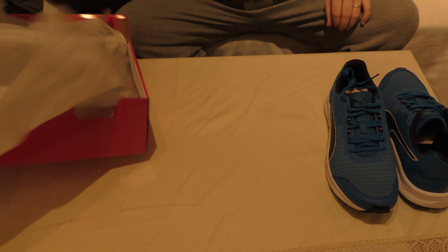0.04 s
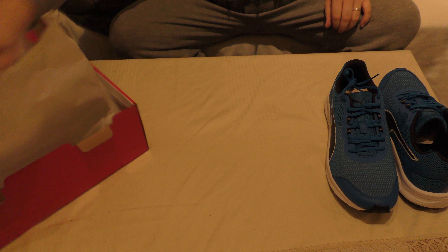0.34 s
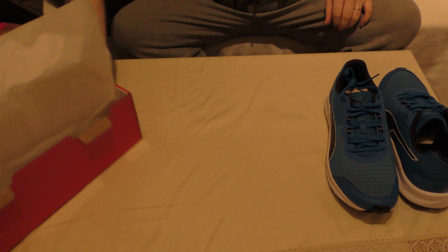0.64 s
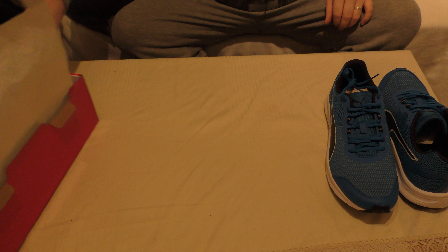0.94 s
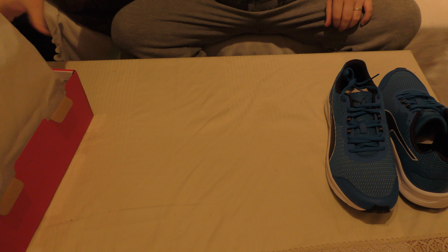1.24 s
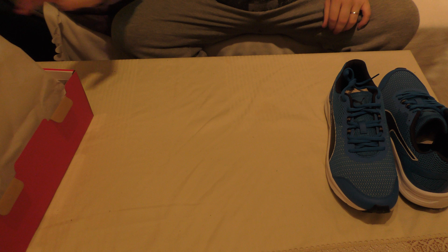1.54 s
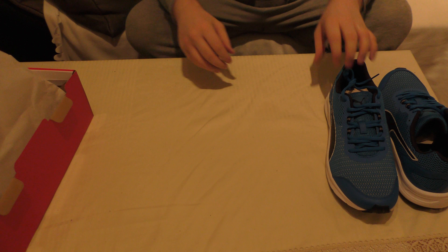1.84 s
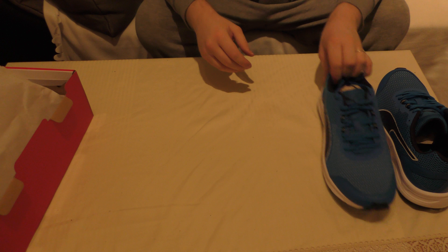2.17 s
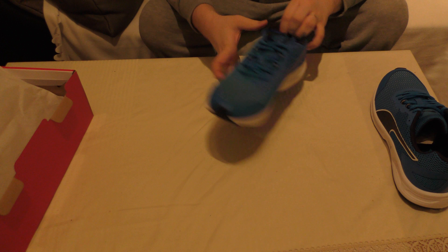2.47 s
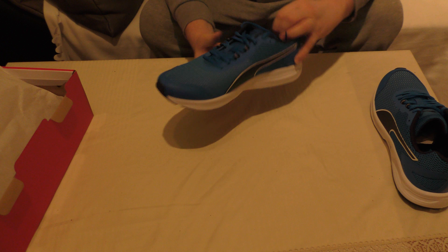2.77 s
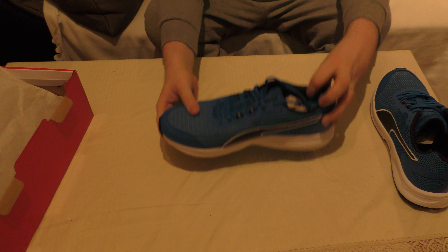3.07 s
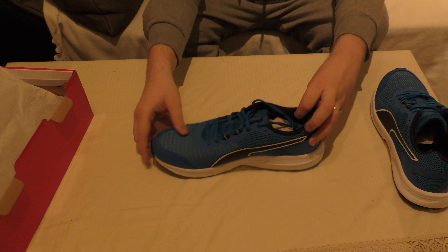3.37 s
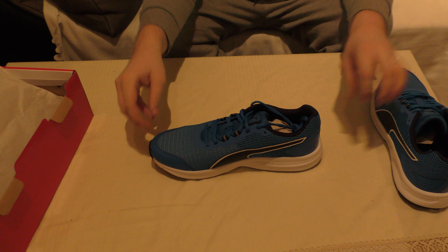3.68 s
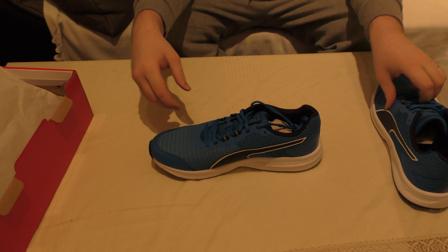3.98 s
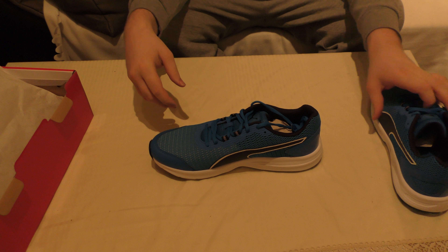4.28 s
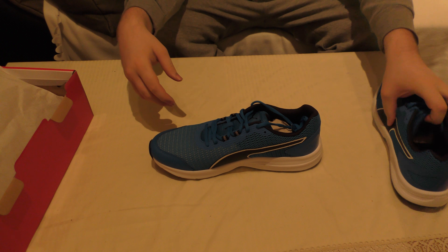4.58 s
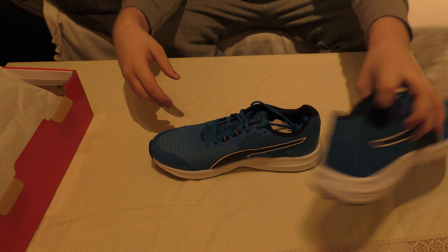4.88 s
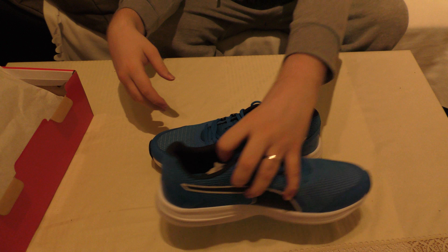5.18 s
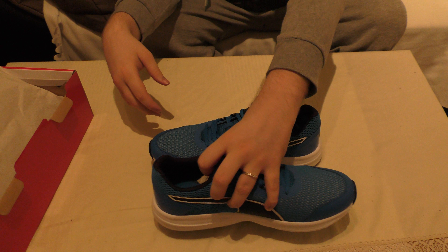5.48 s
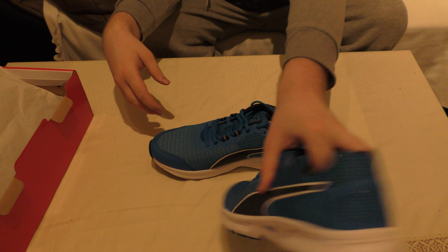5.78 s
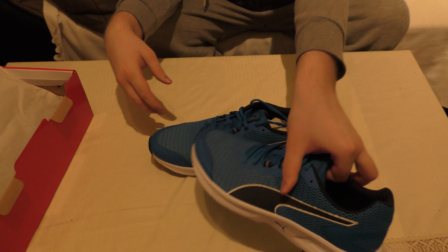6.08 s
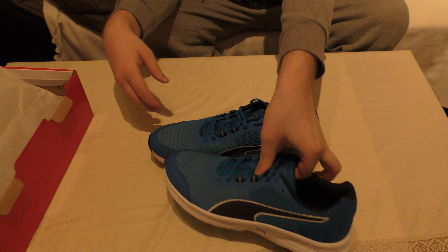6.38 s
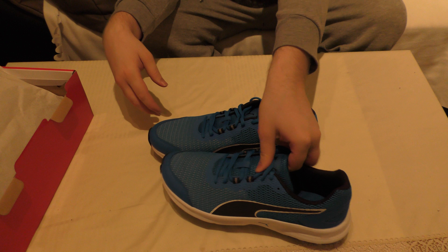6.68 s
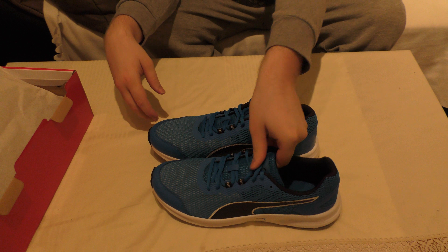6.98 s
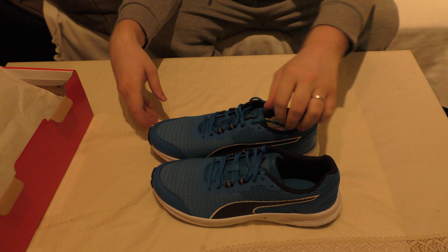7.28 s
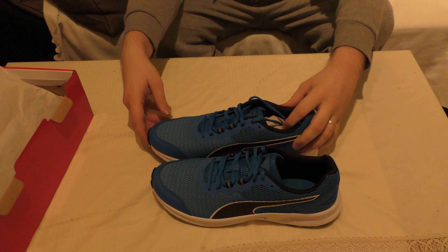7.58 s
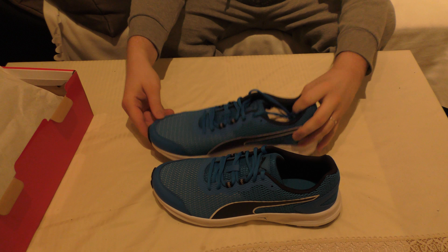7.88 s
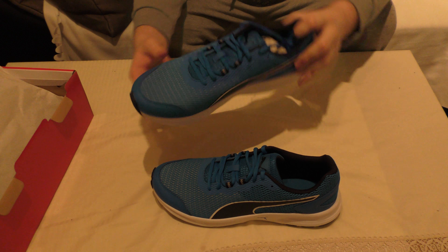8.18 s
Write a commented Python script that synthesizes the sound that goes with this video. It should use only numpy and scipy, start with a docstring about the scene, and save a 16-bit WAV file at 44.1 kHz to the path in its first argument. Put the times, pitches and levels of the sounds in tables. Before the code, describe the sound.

A cardboard shoe box is bumped and pushed across a cloth-covered table with hollow knocks and a scrape, while tissue paper crinkles inside. After about a second it gets quieter: hands and sleeves rub over mesh trainers, with light finger taps. The soft soles land in a cluster of dull, low thumps, then twice more later on. The sound is close, in a small, quiet room with slight reverberation.

```python
"""First come the hollow knocks of a cardboard shoe box, bumped down and pushed aside on a cloth-covered
table: each impact excites damped modes of card and table top. Tissue paper inside crinkles as it buckles.
Then two trainers are picked up, turned and set down on soft soles, which excite mostly the low modes.
Sleeves and mesh uppers rub by stick-slip friction, fingers tap, and a small room reverberates."""
import sys
import numpy as np
from scipy import signal
from scipy.fft import rfft, irfft
from scipy.io import wavfile
from scipy.ndimage import uniform_filter1d

SR = 44100
rng = np.random.default_rng(int(sys.argv[2]) if len(sys.argv) > 2 else 0)


def dump_mix(stems):
    """Bounce the given channels to the path in sys.argv[1] as a 16-bit WAV at rate SR."""
    frames = np.atleast_2d(stems).T  # one column per channel
    limited = np.clip(frames, -1, 1)  # hard clip at full scale
    pcm = np.round(limited * 32767).astype(np.int16)
    wavfile.write(sys.argv[1], SR, pcm)


N = 371630
TIME, HZ = np.arange(N) / SR, np.fft.rfftfreq(N, 1 / SR)

# Levels in the tables are relative; a fall is the time to decay by a factor e.
# spectrum of the still room: (frequency [Hz], level [dB])
HUSH_SPECTRUM = [(25, -4), (60, 2.5), (110, 2.5), (280, 1), (450, -5.5), (750, -17.5), (1100, -9.5),
                 (1700, -7.5), (2600, -8), (4000, -29), (6500, -39), (9500, -19), (16000, -18)]
# reverberation time of the room: (frequency [Hz], t60 [s])
ROOM_DECAY = [(100, 0.14), (250, 0.97), (600, 0.53), (2000, 0.27), (6000, 0.5), (16000, 0.35)]
# reflections from walls and ceiling: (delay [s], level [dB])
REFLECTIONS = [(0.021, -8.5), (.032, -9.5), (.038, -6.5)]
# stereo width: (frequency [Hz], side over mid [ratio])
STEREO_WIDTH = [(30, 1), (70, 0.89), (150, 0.25), (300, 0.56), (600, 0.23), (1200, 0.4), (2500, 0.46),
                (5000, 0.36), (8000, 0.093), (14000, 0.6)]
# a thin squeak as a shoe is lifted: (time [s], pitch [Hz], level [dB])
SQUEAK_CURVE = [(7.879, 13500, -85), (7.92, 13620, -73), (7.99, 13280, -74), (8.04, 13700, -75),
                (8.08, 14200, -71), (8.12, 14350, -68), (8.15, 14400, -88)]
# a last rustle of the settling tissue near 1.4 s, then hands and sleeves stroke the shoes: (start [s], rise
# [s], hold [s], rub [dB], hiss [dB])
HAND_STROKES = [(1.388, 0.036, 0.086, -63, -82), (1.66, .03, 0.064, -77, -64),
                (1.817, 0.12, 0.099, -61, -58.5), (2.057, 0.026, 0.14, -54.5, -58.5),
                (2.212, 0.039, 0.26, -56.5, -59.5), (2.519, 0.066, 0.11, -53, -58),
                (2.772, 0.014, .01, -57, -64), (2.834, 0.19, 0.18, -56, -52.5),
                (3.196, 0.09, 0.22, -58, -67), (3.442, 0.065, .15, -56.5, -62),
                (3.99, 0.0086, 0.14, -58, -63.5), (4.204, 0.053, .03, -53, -60.5),
                (4.312, 0.11, .03, -54.5, -60.5), (4.514, 0.084, 0.11, -56.5, -62),
                (4.927, 0.075, .02, -59, -61), (5.613, 0.044, .035, -54.5, -61.5),
                (5.729, .17, 0.018, -55, -55.5), (6.016, 0.046, 0.11, -55.5, -61),
                (6.195, 0.17, 0.16, -53.5, -59.5), (6.565, .01, 0.082, -52, -52.5),
                (6.755, 0.084, 0.12, -59.5, -66), (6.954, 0.044, 0.064, -55.5, -63),
                (7.052, 0.16, 0.02, -54.5, -59.5), (7.538, 0.024, 0.063, -54, -60),
                (7.7, 0.027, .01, -61, -64), (7.812, 0.028, 0.53, -61.5, -70), (8.26, 0.036, .12, -60, -67)]
# dull rub of fabric: (frequency [Hz], level [dB])
RUB_SPECTRUM = [(60, -7.5), (150, 3.5), (350, 3.5), (550, -4), (780, -4.5), (1100, 2.5), (1500, 0.5),
                (2200, -3), (3200, -6), (5000, -18), (16000, -35.5)]
# fine hiss of the weave: (frequency [Hz], level [dB])
WEAVE_SPECTRUM = [(500, -21), (2000, 5), (3500, 4), (6000, -0.5), (8000, 0), (10500, 0.5), (13000, -3.5),
                  (16000, -13)]
# fingers, soles and lace tips tap: (time [s], level [dB], centre [Hz], width [octaves])
SHOE_TAPS = [(1.063, -40, 2420, 1), (1.524, -46.5, 1800, 0.59), (1.867, -50, 4970, .46),
             (2.082, -58, 352, 0.59), (2.244, -50.5, 463, 0.22), (2.255, -44, 6000, 1.6),
             (2.424, -46.5, 1900, 0.34), (2.558, -43.5, 2180, 0.37), (2.601, -48, 1180, 0.46),
             (2.604, -49.5, 236, 0.5), (2.7817, -45.5, 4030, 3.3), (2.868, -41.5, 2050, 0.24),
             (3.997, -47.5, 1360, 0.58), (3.998, -47.5, 266, 0.94), (4.0613, -43.5, 1410, 0.5),
             (4.0629, -41.5, 8100, 1.4), (4.133, -47, 273, 0.72), (4.253, -42.5, 333, 0.25),
             (4.268, -45.5, 354, 1.3), (4.458, -48.5, 1150, 1.2), (5.2077, -53, 7000, 1.6),
             (6.137, -51, 420, 1.96), (6.5796, -37.5, 1080, 0.34), (6.587, -34, 4900, 2.6),
             (6.613, -47, 1080, .2), (7.5635, -44, 1995, 0.81), (7.635, -44, 6000, 2),
             (7.734, -47, 1700, 0.38), (8.228, -48, 1650, 0.75), (8.312, -49, 1040, 0.22),
             (8.352, -50.5, 1190, 0.21), (8.418, -55, 1300, .4)]
# card and mesh creak as they drag: (time [s], level [dB], centre [Hz], fall [s])
DRAG_CREAKS = [(.307, -31.5, 1695, 0.048), (2.885, -56, 10200, .034), (2.95, -54.5, 1340, 0.13),
               (5.909, -55, 1049, 0.039)]
# a sole lands or rocks on the table: (time [s], level [dB], cut-off [Hz])
SOLE_IMPACTS = [(2.11, -40.5, 400), (3.356, -20.5, 268), (3.513, -20, 330), (3.543, -25, 276),
                (3.5691, -15.5, 310), (4.461, -39, 387), (6.1741, -23.5, 233), (6.276, -41, 240),
                (6.998, -23.5, 320), (7.084, -40.5, 265), (7.549, -35, 194.3), (7.619, -35.5, 210),
                (7.724, -48, 250), (7.857, -44, 169), (7.92, -44, 165)]
# modes of the table top: (frequency [Hz], level [dB], t60 [s])
TABLE_MODES = [(103.6, -30.5, 0.73), (144.7, -5, 0.087), (165, -29, 0.13), (196, -2.5, 0.025),
               (260.4, -21.5, 0.23), (297, -25, 0.046), (372.6, -23, 0.091), (460, -36, 0.039)]
# the tissue is pressed or jolted, then settles: (peak time [s], level [dB], rise [s], fall [s])
TISSUE_CRUMPLES = [(0, -45.5, .01, .06), (.154, -21, 0.003, 0.0025), (.266, -36, 0.079, 0.15),
                   (.445, -35, 0.00084, 0.01), (.585, -36.5, 0.12, 0.12), (.7505, -25, 0.002, 0.014),
                   (.77, -35, .006, 0.065), (1.08, -48, 0.13, 0.16), (1.336, -44.5, 0.011, 0.08)]
# crumpling tissue: (frequency [Hz], level [dB])
CRUMPLE_SPECTRUM = [(400, -3), (780, -10), (1100, 2.5), (1500, 3.5), (2300, 3.5), (3300, 1), (5000, -3.5),
                    (7000, -8), (10500, -9), (13000, -16), (16000, -18)]
# folds of tissue snap: (time [s], level [dB], fall [s])
FOLD_SNAPS = [(0.084, -42.5, .003), (0.153, -27, 0.0023), (0.545, -21, 0.006), (.592, -32, 0.016),
              (.61, -31, 0.01), (0.674, -35.5, 0.0043), (0.911, -36, 0.0038), (1.02, -41.5, 0.0032),
              (1.086, -35, 0.0027), (1.147, -44, 0.0034), (1.341, -43, .011)]
# a snapping fold: (frequency [Hz], level [dB])
SNAP_SPECTRUM = [(200, -4), (1000, -11.5), (2000, -0.5), (3200, -1), (5000, -4.5), (9000, -3),
                 (12000, -3.5), (16000, -15.5)]
# the box is shoved along the cloth: (peak time [s], level [dB], rise [s], fall [s])
BOX_SHOVES = [(0, -50.5, .01, 0.13), (.16, -40, 0.052, 0.071), (.29, -29, 0.052, .027),
              (.6, -39, 0.088, 0.064), (.78, -36, 0.014, 0.056), (1.0, -46, 0.34, 0.16)]
# card sliding on cloth: (frequency [Hz], level [dB])
SLIDE_SPECTRUM = [(40, -33), (100, -27), (142, 14.5), (190, -7), (300, 2.5), (520, -4), (800, -12.5),
                  (1150, -6.5), (1500, -13), (1770, -9), (2300, -12.5), (4000, -15), (16000, -39)]
# the box meets the table: (time [s], level [dB], crack pitch [ratio], panel ring [dB], table boom [dB])
BOX_BUMPS = [(0.156, -9, 1.77, -23.5, -38), (.168, -17, 1.33, -23, 5), (.247, -36, 0.66, -33, 22.5),
             (0.255, -23.5, 0.98, -5.5, 14.5), (.270, -30.5, 1.1, 3.5, 19.5), (.287, -26.5, 0.83, -10, 9.5),
             (.445, -9.5, 1.03, -13, 3.5), (.465, -32.5, 0.95, 3.5, -20.5), (0.493, -36.5, 0.39, 4, 28),
             (0.748, -33.5, 2.7, -13, 19.5), (.757, -24, 1.54, -7.5, 8.5)]
# heavily damped modes of the struck card: (frequency [Hz], level [dB], t60 [s])
CRACK_MODES = [(401, -6, 0.026), (549, -15, 0.025), (721, -7.5, 0.019), (1080, -2.5, 0.012),
               (1110, -4.5, 0.01), (1350, -11, 0.026), (2800, -11.5, 0.011)]
# modes of the cardboard panels: (frequency [Hz], level [dB], t60 [s])
PANEL_MODES = [(141, -5, .5), (254, 0, .45), (313, -10, .3), (380, -2, .25), (431, -2, .3), (505, -3, .28),
               (550, -5, .3), (645, -12, .2), (1149, -10, .08), (1374, -7, .08), (1545, -10, .1),
               (1960, -10, .06)]


def amp(db):
    """Amplitude grows tenfold every 20 dB."""
    return 10 ** (np.asarray(db) / 20)


def unit(x):
    """Normalisation to rms 1."""
    return x / np.sqrt(np.mean(x ** 2) + 1e-20)


def read(points, hz):
    """Interpolation on a logarithmic frequency axis."""
    frequencies, values = np.transpose(points)
    return np.interp(np.log(hz + 1), np.log(frequencies + 1), values)


def add(mix, s, sound):
    """Superposition: a sound joins the mix at s seconds."""
    part = mix[max(round(s * SR), 0):][:len(sound)]
    part += sound[:len(part)]


def tint(x, spectrum):
    """Spectral shaping, at rms 1."""
    return unit(irfft(rfft(x) * amp(read(spectrum, HZ)), N))


def muffle(x, hz, order=2):
    """Low-pass filtering: a softer contact passes less treble."""
    return signal.sosfilt(signal.butter(order, min(hz, SR / 2 - 100), fs=SR, output="sos"), x)


def ring(modes, detune=0, stiffness=1):
    """Free vibration is a sum of damped modes, shifted by the place struck; slow motion radiates poorly."""
    t = TIME[:SR // 2]
    motion = np.zeros(len(t))
    for hz, db, t60 in modes:
        shifted_hz = hz * stiffness * (1 + detune * rng.normal())
        motion += amp(db - 60 * t / t60) * np.sin(2 * np.pi * shifted_hz * t)
    return signal.sosfilt(signal.butter(4, 112, "high", fs=SR, output="sos"), motion)


def grains(per_s, spread_db, bed):
    """Shot noise: slips and buckles of unequal size over a bed of countless smaller ones."""
    size = amp(spread_db * np.minimum(rng.exponential(1, N), 4))
    occurs = rng.random(N) < per_s / SR
    clicks = unit(size * occurs * rng.standard_normal((2, N)))
    return clicks + bed * rng.standard_normal((2, N))


def patchy(x, depth_db):
    """Spectral modulation: shifting contact lifts and lowers patches of the spectrum briefly."""
    spectra = signal.stft(x, nperseg=512, noverlap=384)[2]
    patches = uniform_filter1d(rng.standard_normal(spectra.shape[1:]), size=9, axis=0)
    patches = unit(uniform_filter1d(patches, size=9, axis=1))
    return signal.istft(spectra * amp(depth_db * patches), nperseg=512, noverlap=384)[1][:, :N]


def swell(s, db, rise, fall):
    """Exponential growth to a peak at s seconds, then exponential decay."""
    return amp(db) * np.exp(-np.maximum((s - TIME) / rise, (TIME - s) / fall).clip(0, 20))


def swells(rows):
    """Incoherent swells of noise add in power."""
    return np.sqrt(sum(swell(*row) ** 2 for row in rows))


def stereo(pair):
    """Partial coherence: two unrelated signals, as mid and side, form left and right."""
    side = irfft(rfft(pair[1]) * read(STEREO_WIDTH, HZ), N)
    return np.array([pair[0] + side, pair[0] - side])


def pan(x, left_db):
    """A level difference between the ears leans a source to the left."""
    return x * amp([[left_db / 2], [-left_db / 2]])


def walls(x):
    """Early reflections add delayed, weaker copies of a sound."""
    out = x.copy()
    for delay, db in REFLECTIONS:
        add(out, delay, amp(db) * x)
    return out


def room(x, wet_db):
    """Reverberation: a diffuse tail follows the direct sound, each band decaying at its own rate."""
    hz, t, spectra = signal.stft(rng.standard_normal((2, SR * 3 // 4)), SR, nperseg=256)
    decay = amp(-60 * t / read(ROOM_DECAY, hz)[:, None])
    tail = signal.istft(spectra * decay, SR, nperseg=256)[1]
    tail *= np.clip((TIME[:tail.shape[1]] - .003) / 0.0034, 0, 1)  # the first walls answer after 3 ms
    mono = np.atleast_2d(x).mean(0)[None]
    wet = signal.fftconvolve(mono, tail / np.linalg.norm(tail[0]), axes=1)[:, :N]
    return x + amp(wet_db) * stereo(wet)


def hush():
    """Stationary noise, strongest in the bass, is the background of the still room."""
    return amp(-64) * stereo(tint(rng.standard_normal((2, N)), HUSH_SPECTRUM))


def squeak(jitter_hz=110):
    """Random frequency modulation makes a faint, very high whistle unsteady."""
    s, hz, _ = np.transpose(SQUEAK_CURVE)
    jitter = unit(uniform_filter1d(rng.standard_normal(N), size=60))
    pitch = np.interp(TIME, s, hz) + jitter_hz * jitter
    level_db = np.interp(TIME, s, [db for _, _, db in SQUEAK_CURVE])
    sounding = (TIME > s[0]) & (TIME < s[-1])
    return amp(level_db) * sounding * np.sin(2 * np.pi * np.cumsum(pitch) / SR)


def stroke(start, rise, hold, sag_db_per_s=11.5, release_s=0.097):
    """Friction noise follows sliding speed: a hand speeds up, eases off and stops."""
    t = np.maximum(TIME - start, 0)
    attack = np.minimum(t / rise, 1)
    sag = amp(-sag_db_per_s * np.maximum(t - rise, 0))
    release = np.exp(-((t - rise - hold) / release_s).clip(0, 20))
    return attack * sag * release


def cloth():
    """Stick-slip friction of fabric gives a dull rub, and a fine hiss where threads catch."""
    rub_power, hiss_power = amp(-66) ** 2, amp(-73.5) ** 2  # clothes never keep quite still
    for start, rise, hold, rub_db, hiss_db in HAND_STROKES:
        speed = stroke(start, rise, hold)
        rub_power += (amp(rub_db) * speed) ** 2
        hiss_power += (amp(hiss_db) * speed) ** 2
    slips = patchy(grains(per_s=900, spread_db=2.5, bed=1.58), depth_db=2.87)
    rub = tint(slips, RUB_SPECTRUM) * np.sqrt(rub_power)
    hiss = tint(grains(per_s=700, spread_db=3.0, bed=2.3), WEAVE_SPECTRUM) * np.sqrt(hiss_power)
    grip_db = 0.87 * unit(muffle(rng.standard_normal(N), hz=35)) - 1.5
    return room(stereo(rub + hiss) * amp(grip_db), wet_db=-9.5)


def touch(db, centre_hz, octaves, fall):
    """Source and filter: an impulse and a dying scratch excite one resonance."""
    fade = np.exp(-TIME[:SR // 2] / fall)
    contact = rng.standard_normal(len(fade)) * fade
    contact[0] += 6  # the impulse
    edges = np.minimum(centre_hz * 2 ** (np.array([-.5, .5]) * octaves), [SR / 3, SR / 2.1])
    sound = signal.sosfilt(signal.butter(1, edges, "band", fs=SR, output="sos"), contact)
    return amp(db) * unit(muffle(sound, 2 * edges[1])) * np.std(fade)


def taps_and_creaks(fall_cycles=6.05):
    """Equal damping per cycle makes low taps last longer than high ones; creaks have a narrower band."""
    out = np.zeros(N)
    for s, db, centre_hz, octaves in SHOE_TAPS:
        add(out, s, touch(db, centre_hz, octaves, fall_cycles / centre_hz))
    for s, db, centre_hz, fall in DRAG_CREAKS:
        add(out, s, touch(db, centre_hz, octaves=0.17, fall=fall))
    return room(out, wet_db=-5)


def soles():
    """A compliant impact excites mostly low modes: foam soles draw a short boom from the table."""
    out = np.zeros(N)
    for s, db, cutoff_hz in SOLE_IMPACTS:
        add(out, s, -amp(db) * muffle(ring(TABLE_MODES), cutoff_hz, order=3))
    return room(walls(out), wet_db=-15.5)


def tissue(rise_over_fall=0.98):
    """Buckling paper emits countless tiny clicks; a whole fold gives way in one short burst."""
    clicks = grains(per_s=4000, spread_db=2.0, bed=0.35)
    crush = amp(-1) * tint(clicks, CRUMPLE_SPECTRUM) * swells(TISSUE_CRUMPLES)
    bursts = sum(swell(s, db, rise_over_fall * fall, fall) for s, db, fall in FOLD_SNAPS)
    folds = tint(rng.standard_normal((2, N)), SNAP_SPECTRUM) * bursts
    return pan(room(stereo(crush + folds), wet_db=-6.0), left_db=1.5)


def box(boom_band_hz=(122, 910)):
    """Impacts excite the modes of the struck card, the panels and the table; sliding friction scrapes."""
    cracks, panels, booms = np.zeros((3, N))
    for s, db, stiffness, ring_db, boom_db in BOX_BUMPS:
        crack = muffle(ring(CRACK_MODES, stiffness=stiffness), hz=2250 * stiffness)
        add(cracks, s, amp(db - 2) * crack)
        add(panels, s, amp(db + ring_db) * ring(PANEL_MODES, detune=0.0035))
        add(booms, s, -amp(db + boom_db) * ring(TABLE_MODES))
    # the light box cannot shake the table as deeply as a shoe
    booms = signal.sosfilt(signal.butter(2, boom_band_hz, "band", fs=SR, output="sos"), booms)
    slips = patchy(grains(per_s=1200, spread_db=-2.0, bed=0.67), depth_db=-1.5)
    scrape = stereo(tint(slips, SLIDE_SPECTRUM)) * swells(BOX_SHOVES)
    body = room(amp(-5.0) * panels + amp(-8.5) * walls(booms), wet_db=-15.5)
    return pan(room(cracks, wet_db=-5.0), left_db=2.5) + body + scrape


def scene():
    """Sound pressures superpose: everything on the table, over the hush of the room."""
    return box() + tissue() + soles() + taps_and_creaks() + cloth() + squeak() + hush()


def record(dry):
    """Band limiting: a steep low-pass filter removes the highest treble."""
    low_pass = signal.firwin(511, cutoff=15950, window=("kaiser", 9), fs=SR)
    return signal.oaconvolve(dry, low_pass[None], "same")


dry = scene()
out = record(dry)
dump_mix(out)
```